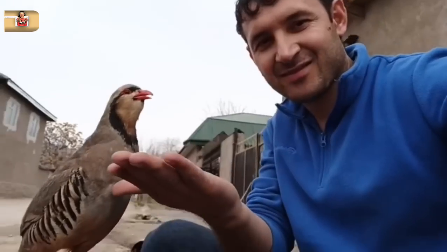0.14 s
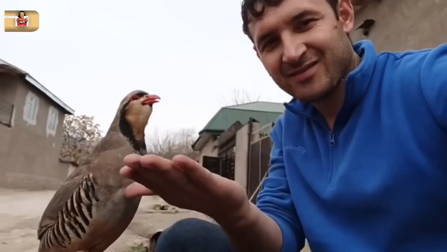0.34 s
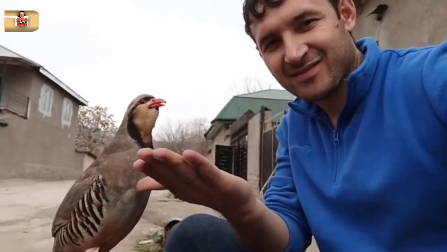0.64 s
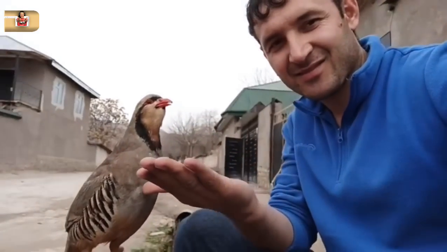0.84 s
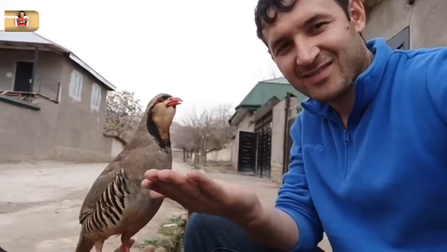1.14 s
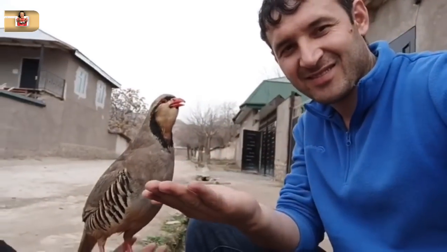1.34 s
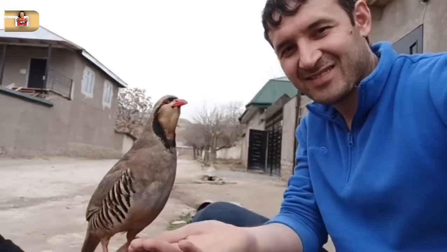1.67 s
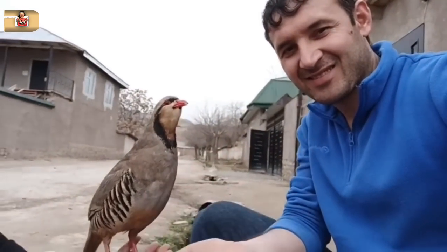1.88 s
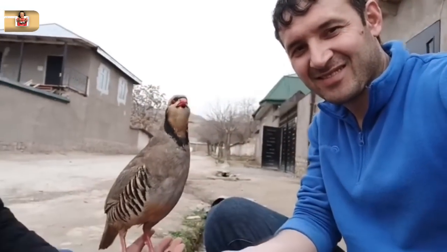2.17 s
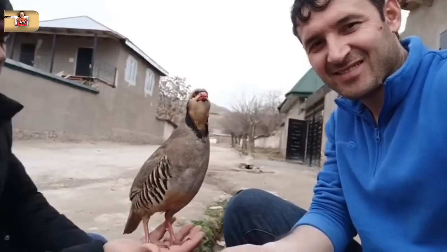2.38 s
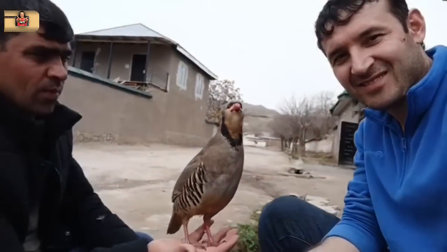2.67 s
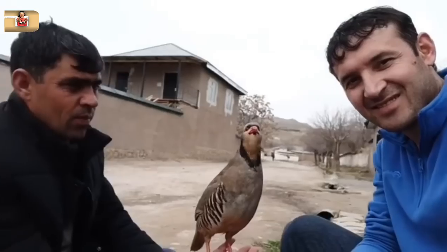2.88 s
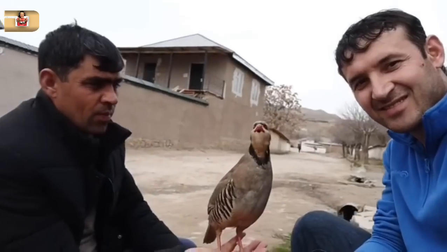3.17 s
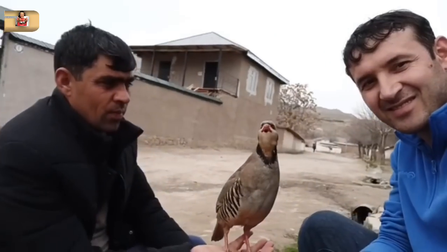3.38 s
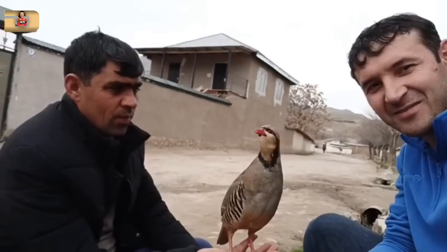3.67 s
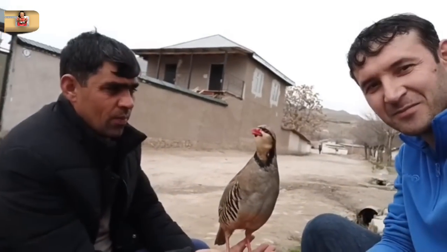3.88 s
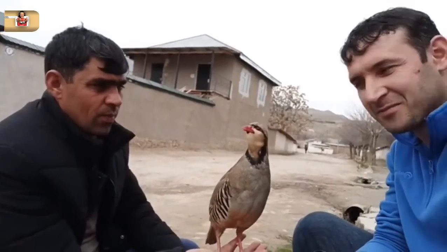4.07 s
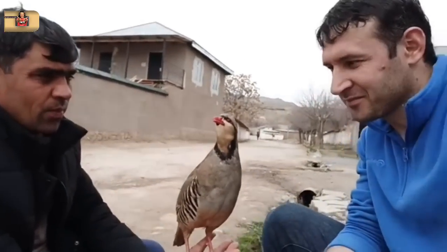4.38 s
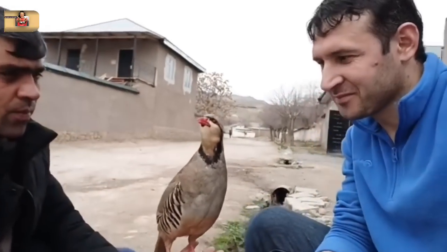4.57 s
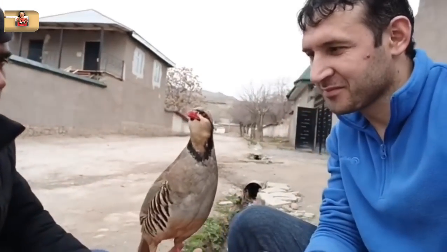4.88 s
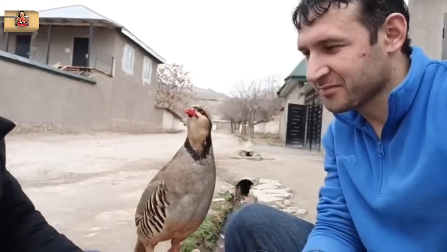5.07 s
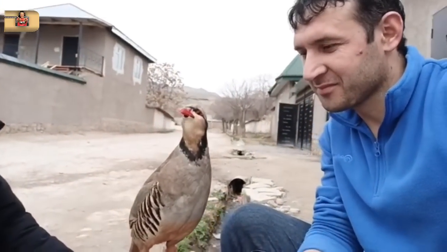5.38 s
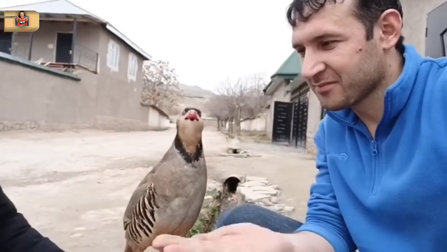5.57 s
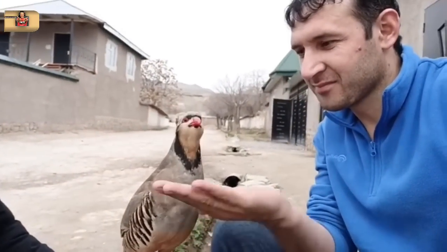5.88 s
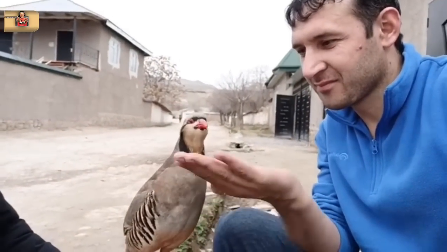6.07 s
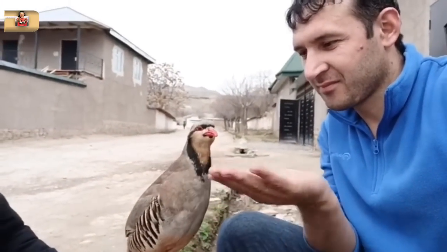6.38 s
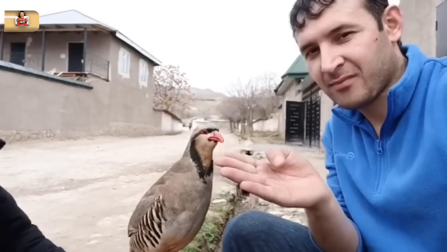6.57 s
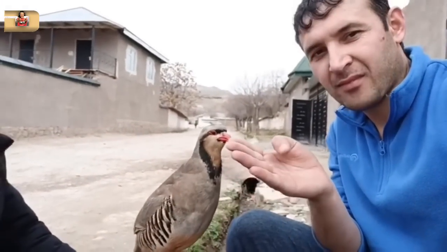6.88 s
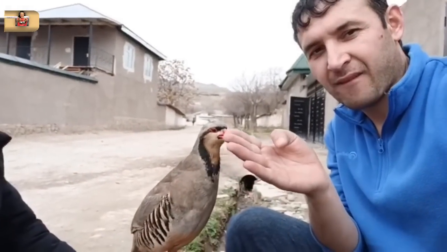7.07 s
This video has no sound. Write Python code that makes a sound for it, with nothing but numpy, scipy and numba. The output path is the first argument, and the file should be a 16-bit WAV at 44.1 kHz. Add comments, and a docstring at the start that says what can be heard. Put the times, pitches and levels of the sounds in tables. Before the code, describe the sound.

Close, dry, outdoor stereo phone sound: a chukar's throaty, nasal clucks, each a tiny hard burst breaking from higher to lower pitch with a bright rasp. First even and loud, then rougher and broken up by squawks that growl before a sharp accent, then a quick run and a few spaced last notes. Faint reflections off walls, low wind buffets, quiet lane hush; afterward very faint distant wavering tones and cloth brushes.

```python
"""In a quiet village lane a chukar partridge calls about thirty harsh notes, close by, then stops.
Pulses from its syrinx break between a high and a low register and rasp at the breaks; resonant
filters for mouth, throat and windpipe colour them. Delayed copies and decaying noise make the faint
reflections; filtered noise and short low thumps buffet the two microphone ports.
A few thin wavering tones call far off, cloth rustles softly, and shaped noise is the village hush."""
import sys
import numpy as np
from scipy import signal
from scipy.fft import rfft, irfft
from scipy.io import wavfile
from scipy.ndimage import uniform_filter1d, minimum_filter1d, map_coordinates
from numba import njit

SR = 44100
rng = np.random.default_rng(int(sys.argv[2]) if len(sys.argv) > 2 else 0)


def wav_out(sig):
    """Save sig, one row per channel (or a flat mono array), as 16-bit PCM at SR to the path in sys.argv[1]."""
    wavfile.write(sys.argv[1], SR, np.round(np.clip(np.atleast_2d(sig).T, -1, 1) * 32767).astype(np.int16))


N = 319284

# spectrum of the village hush: freq_hz, relative_level_db
VILLAGE_COLOUR = [(40, -10.5), (100, 4), (190, -4.5), (290, 6), (450, -4), (650, -7.5), (1100, -14),
                  (1700, -17.5), (2700, -22), (4200, -19.5), (5400, -30.5), (7000, -22), (13000, -36)]
# spectrum of air turbulence at the ports: freq_hz, relative_level_db
AIR_COLOUR = [(25, -27), (50, -16), (80, 1), (115, 1), (180, -13.5), (260, -11.5), (450, -26),
              (1000, -62.5)]
# gusts: start_s, length_s, relative_level_db, dying_away_db
AIR_GUSTS = [(.55, 1.07, -36.5, 7), (2.17, .93, -41, 1), (4.18, .84, -41.5, 1), (5.0, 1.25, -57, -4),
             (7.14, .1, -54, 0)]
# sharper puffs: centre_s, relative_level_db
AIR_PUFFS = [(0.54, -31.5), (0.645, -21), (0.688, -21.5), (0.776, -17), (0.955, -20.5), (1.07, -24),
             (1.238, -22.5), (1.597, -21.5), (2.38, -24.5), (2.644, -22.5), (2.809, -21.5), (4.25, -20.5),
             (4.597, -26), (4.638, -21.5), (4.74, -27), (5.011, -23.5), (5.472, -32), (6.15, -37),
             (7.19, -40.5)]
# clucks start in the high register, break to the low one, sag and may trail off in a croak;
# long ones slacken midway and catch again. slide_oct enters the low register from above (+) or below (-):
# start_s, rise_s, hold_s, croak_s, level_db, sag_db, midway_dip_db, break_after_s, catch_after_s (0 = none),
# high_pitch_hz, low_pitch_hz, slide_oct, roughness (0-1), mouth_hz, treble_db (relative)
CLUCK_NOTES = [(0.104, 0.007, 0.033, 0.003, -7.0, 7.7, 0.0, 0.004, 0.0, 495, 452, -0.08, 0.08, 1424, -24.7),
               (0.261, 0.008, 0.037, 0.003, -6.8, 11.1, 0.0, 0.005, 0.0, 490, 446, -0.06, 0.08, 1343, -21.8),
               (0.414, 0.01, 0.036, 0.004, -6.6, 11.3, 0.0, 0.006, 0.0, 539, 436, -0.02, 0.08, 1334, -24.9),
               (0.567, 0.015, 0.037, 0.007, -6.5, 17.3, 2.1, 0.012, 0.0, 487, 437, -0.02, 0.08, 1287, -26.2),
               (0.729, 0.015, 0.031, 0.004, -7.8, 9.2, 0.7, 0.01, 0.0, 556, 421, 0.06, 0.08, 1263, -27.6),
               (0.88, 0.014, 0.058, 0.007, -8.1, 5.2, 2.0, 0.012, 0.0, 559, 424, 0.05, 0.08, 1233, -24.3),
               (1.076, 0.019, 0.046, 0.006, -10.8, 0.6, 0.7, 0.014, 0.046, 531, 408, 0.05, 0.26, 1217, -22.7),
               (1.238, 0.024, 0.029, 0.018, -10.0, 7.2, 4.7, 0.02, 0.0, 553, 415, -0.0, 0.22, 1172, -24.4),
               (1.346, 0.021, 0.02, 0.005, -9.9, 13.9, 0.0, 0.016, 0.0, 490, 396, 0.09, 0.19, 1157, -21.8),
               (1.538, 0.021, 0.009, 0.019, -13.5, 6.3, 1.3, 0.019, 0.0, 526, 415, -0.09, 0.33, 1076, -23.0),
               (1.91, 0.013, 0.013, 0.006, -18.2, 0.0, 1.1, 0.01, 0.0, 649, 525, 0.01, 0.31, 1033, -16.7),
               (2.282, 0.018, 0.015, 0.037, -11.5, 0.0, 0.0, 0.023, 0.041, 571, 415, -0.02, 0.29, 1136, -19.5),
               (2.385, 0.025, 0.017, 0.007, -10.3, 13.7, 0.0, 0.027, 0.0, 624, 409, 0.02, 0.35, 1169, -20.7),
               (2.602, 0.019, 0.019, 0.006, -12.1, 9.4, 0.0, 0.034, 0.0, 586, 370, 0.28, 0.28, 1212, -21.3),
               (2.961, 0.02, 0.013, 0.006, -17.2, 4.8, 0.0, 0.046, 0.0, 652, 483, 0.02, 0.19, 1082, -24.3),
               (3.325, 0.014, 0.051, 0.007, -12.1, 0.0, 0.9, 0.027, 0.048, 579, 404, 0.01, 0.26, 1186, -20.4),
               (3.501, 0.015, 0.064, 0.006, -10.9, 4.9, 6.7, 0.024, 0.055, 577, 414, 0.04, 0.24, 1147, -22.9),
               (3.732, 0.018, 0.026, 0.004, -8.4, 12.0, 0.4, 0.015, 0.0, 622, 448, 0.04, 0.19, 1340, -25.2),
               (3.886, 0.014, 0.078, 0.004, -10.6, 7.0, 7.2, 0.032, 0.0, 617, 415, 0.09, 0.25, 1188, -26.1),
               (4.12, 0.015, 0.032, 0.003, -9.4, 9.2, 0.0, 0.012, 0.0, 604, 445, 0.13, 0.25, 1341, -27.3),
               (4.262, 0.014, 0.08, 0.009, -9.1, 0.9, 6.9, 0.021, 0.07, 603, 430, 0.1, 0.38, 1288, -23.4),
               (4.494, 0.014, 0.046, 0.006, -8.2, 16.6, 0.5, 0.013, 0.0, 602, 428, 0.1, 0.19, 1298, -26.6),
               (4.646, 0.011, 0.033, 0.01, -9.9, 16.3, 0.0, 0.033, 0.0, 600, 446, 0.01, 0.24, 1239, -26.4),
               (4.973, 0.013, 0.011, 0.022, -11.9, 0.0, 0.9, 0.034, 0.0, 555, 416, 0.3, 0.23, 1106, -19.8),
               (5.334, 0.015, 0.012, 0.022, -12.6, 0.0, 2.0, 0.018, 0.0, 542, 402, 0.07, 0.34, 1094, -23.6),
               (5.717, 0.017, 0.017, 0.006, -17.7, 7.9, 0.0, 0.044, 0.0, 670, 473, -0.05, 0.29, 1010, -17.0)]
# squawks start as a low-level growl, swell to an accent and fall away:
# start_s, growl_s, swell_s, fall_s, growl_db, accent_db, growl_pitch_hz, accent_pitch_hz,
# roughness (0-1), mouth_hz, treble_db (relative)
SQUAWK_NOTES = [(1.659, 0.048, 0.042, 0.022, -27.0, -14.7, 682, 378, 0.45, 1142, -16.0),
                (2.027, 0.05, 0.042, 0.022, -29.4, -12.4, 555, 401, 0.39, 1068, -12.5),
                (2.726, 0.027, 0.038, 0.021, -32.0, -14.0, 541, 382, 0.36, 1144, -21.0),
                (3.078, 0.032, 0.043, 0.017, -29.2, -12.5, 442, 393, 0.35, 1152, -18.0),
                (4.751, 0.008, 0.048, 0.015, -19.5, -10.4, 550, 404, 0.45, 1180, -18.0),
                (5.096, 0.048, 0.029, 0.023, -23.4, -9.7, 684, 415, 0.29, 1123, -17.4),
                (5.473, 0.034, 0.042, 0.015, -24.4, -10.0, 632, 410, 0.24, 1132, -15.7)]
# steady colour of the throat: freq_hz, level_db
THROAT_COLOUR = [(200, -12), (380, -3.5), (650, -2), (900, -3), (1250, 0), (1450, -1), (1750, -11),
                 (2050, -21), (2500, -18), (3200, -26), (4500, -50)]
# the bird stretches and draws in its neck: time_s, windpipe_tuning_factor
NECK_TUNING = [(0.12, 1.107), (0.45, 1.047), (0.9, 1.018), (1.7, 0.97), (3.1, 0.95), (3.9, 1.014),
               (4.8, 0.98), (5.7, 0.96)]
# dips between the windpipe's resonances: centre_hz, width_hz (centre before neck tuning)
WINDPIPE_DIPS = [(3050, 150), (5950, 800)]
# resonances of the windpipe: centre_hz, width_hz, relative_level_db (centre before neck tuning)
WINDPIPE_RESONANCES = [(3842, 505, -5.5), (4636, 410, 2.5), (4795, 250, -6), (7214, 723, -11.5),
                       (11920, 1100, -19.5)]
# where the bird stands: time_s, left_minus_right_db, left_lead_ms
BIRD_PLACE = [(0.1, 0.3, .16), (0.7, 1, 0.15), (1.2, -5, .13), (1.8, -6, 0.093), (2.3, -5.2, 0.079),
              (2.8, -5.5, 0.0029), (3.3, -4, 0.013), (3.8, -3.5, 0.00025), (4.3, -4, .02), (4.8, -6, 0.075),
              (5.6, -5.6, 0.08)]
# the phone's body shades and delays its ports: freq_hz, left_minus_right_db, left_phase_lead_rad
PORT_SHADING = [(300, 2.5, -0.26), (670, 5.5, -1.3), (980, 1.5, -.9), (1320, -1.5, -0.44), (2340, 0, -0.14),
                (4500, -4, 0.32), (11900, -3, 0.67)]
# thin far-off calls: start_s, length_s, start_pitch_hz, middle_pitch_hz, end_pitch_hz, level_db
DISTANT_CALLS = [(3.153, 0.65, 320, 304, 334, -54), (5.985, .22, 365, 327, 320, -55),
                 (6.132, 0.11, 1040, 970, 995, -58.5), (6.331, .65, 405, 398, 320, -58),
                 (6.54, 0.17, 1950, 1710, 1700, -68.5), (6.95, 0.069, 4300, 3700, 3350, -72)]
# soft rustles of sleeve and hand: start_s, length_s, centre_hz, level_db
CLOTH_RUSTLES = [(6.797, 0.078, 650, -54), (7.061, 0.033, 787, -50), (7.066, 0.097, 346, -55.5)]
# colour of the glancing copies, the wall tail and the phone's treble: freq_hz, level_db
GLANCE_COLOUR = [(1400, -24), (2400, 3.5)]
WALL_COLOUR = [(400, 13.5), (1500, -2), (5000, -2), (12000, -12.5)]
PHONE_COLOUR = [(8200, 0), (9200, -12), (11000, -24.5), (11800, 3)]

TIME = np.arange(N) / SR
BINS = np.fft.rfftfreq(N, 1 / SR)
VILLAGE_DB = -54.5  # average over both channels, before slow swells
CALM_DB, GUST_EDGE_S = -59, .08  # breeze between gusts, relative; softening of gust edges
# effort is in dB around a note's nominal level; pitch, mouth and treble follow it
SILENT_DB, RELEASE_S = -36, .009  # effort at a cluck's onset; drop from hold to croak
CROAK_DB, CROAK_FADE_DB = -15, 12
PITCH_OCT_PER_DB, HIGH_OCT_PER_DB, MOUTH_OCT_PER_DB, TREBLE_DB_PER_DB = .018, .002, .011, -.17
SQUAWK_MOUTH_OCT_PER_DB, SQUAWK_FALL_OCT_PER_S = .036, 9
CROAK_ROUGH, GROWL_ROUGH = .45, .25  # added roughness
BREAK_S, BREAK_DIP_DB, BREAK_ROUGH = .0025, 7, .35  # the voice stumbles as it changes register
SLIDE_S = .012  # time the pitch takes to settle after the break
HIGH_FALL_OCT_PER_S = 4  # the high register sinks towards the break
CATCH_S, CATCH_DIP_DB, SURGE_DB = .005, 7, 3  # a long note catches briefly, then surges
GROWL_DIP_DB, GROWL_DIP_S = 5, .005  # the voice slackens between growl and swell
RATTLE_S, RATTLE_DB, RATTLE_OCT = .024, 2.5, .3  # the growl comes in bursts, each sliding down in pitch
STUMBLE_DB, STUMBLES_PER_S = 4.5, 150  # unsteady effort of a fully rough voice
WOBBLE_OCT, WOBBLES_PER_S = .12, 110  # unsteady pitch of a fully rough voice
TREBLE_FLICKER_DB, TREBLE_FLICKERS_PER_S = 2.4, 70
LOUDEST_DB = -7  # ceiling on the voice's effort
TOP_HZ = 13600  # the phone passes nothing much above this


def undb(db):
    """Decibels to gain."""
    return 10 ** (np.asarray(db) / 20)


def unit(x):
    """Scale to rms 1."""
    return x / np.sqrt(np.mean(x ** 2))


def over_bins(hz, values):
    """Join points by straight lines on a log-frequency axis."""
    return np.interp(np.log(BINS + 1), np.log(hz), values)


def colour(x, points):
    """Filter by (Hz, dB) points."""
    return irfft(rfft(x) * undb(over_bins(*np.transpose(points))), N)


def smooth(x, seconds):
    """Triangular moving average, two box averages of the given length."""
    size = max(int(seconds * SR), 1)
    return uniform_filter1d(uniform_filter1d(x, size), size)


def steady(x, seconds):
    """Even out the level, keeping whatever is faster than the given time."""
    return x / np.sqrt(np.abs(smooth(x ** 2, seconds)) + 1e-12)


def walk(rate):
    """Smooth chance with a spread near 1, heading for a new value `rate` times a second."""
    knots = rng.standard_normal(N // 8)
    # straight lines between knots shrink the spread; the factor restores it
    return np.sqrt(3 / 2) * np.interp(TIME * rate, np.arange(len(knots)), knots)


def span(start, length):
    """Sample indices of an event and its progress 0-1."""
    i = np.arange(max(int(start * SR), 0), min(int((start + length) * SR), N))
    return i, np.linspace(0, 1, len(i))


def arch(u, first, middle, last):
    """Parabola through three values."""
    return first * (1 - u) * (1 - 2 * u) + middle * 4 * u * (1 - u) + last * u * (2 * u - 1)


@njit
def resonate(x, hz, width):
    """State-variable band-pass whose centre moves."""
    y, band, low = np.empty(len(x)), 0., 0.
    for i in range(len(x)):
        g, damping = np.tan(np.pi * hz[i] / SR), width / hz[i]
        v = (band + g * (x[i] - low)) / (1 + g * (g + damping))
        band, low, y[i] = 2 * v - band, low + 2 * g * v, damping * v
    return y


def village(swell_db=1, shared=0.76):
    """Quiet outdoor hush: shaped noise, partly the same in both ports, swelling gently."""
    noise = rng.standard_normal((2, N)) + shared * rng.standard_normal(N)
    return unit(colour(noise, VILLAGE_COLOUR)) * undb(VILLAGE_DB + swell_db * walk(12))


def breeze():
    """Strength of the air at the phone: gusts rise out of a calm and change in level as they pass."""
    gain = np.zeros(N)
    for start, length, db, dying_db in AIR_GUSTS:
        i, u = span(start, length)
        gain[i] += undb(db - dying_db * u)
    return undb(CALM_DB) + smooth(gain, GUST_EDGE_S)


def buffeting(air_db=-3, puff_db=-1, left_db=4, right_db=-5.5, flutter_db=4.5):
    """Eddies push on each port separately, mostly the left; a strong one is a single dull thump."""
    puff_s, puff_hz = .0052, 120  # width and lowest pitch of a thump
    gain = breeze() * undb(air_db + flutter_db * walk(35))
    out = np.array([gain * steady(colour(rng.standard_normal(N), AIR_COLOUR), .02) for _ in range(2)])
    for (centre, db), chance in zip(AIR_PUFFS, rng.random((len(AIR_PUFFS), 3))):
        i, _ = span(centre - .05, .1)
        t = TIME[i] - centre
        pitch = puff_hz * (1 + .5 * chance[0])
        swing = np.sin(2 * np.pi * (pitch * t + chance[1:, None]))  # own phase at each port
        out[:, i] += undb(db + puff_db) * np.exp(-(t / puff_s) ** 2) * swing
    return out * undb([[left_db], [right_db]])


def cluck(rise, hold, croak, level_db, sag_db, dip_db, break_s, catch_s,
          high_hz, low_hz, slide_oct, rough, mouth_hz, treble_db):
    """Quick attack, sagging hold, release into a croak; the register breaks, and a long note catches."""
    t = TIME[:int((rise + hold + RELEASE_S + croak) * SR)]
    attack = SILENT_DB * np.clip(1 - t / rise, 0, 1) ** 2
    held = np.clip((t - rise) / hold, 0, 1)
    released = np.clip((t - rise - hold) / RELEASE_S, 0, 1)
    faded = np.clip((t - rise - hold - RELEASE_S) / croak, 0, 1)
    sag = sag_db * held ** 2.5 + dip_db * np.sin(np.pi * held) ** 2
    effort = attack - sag + CROAK_DB * released - CROAK_FADE_DB * faded ** 2
    breaking = np.exp(-((t - break_s) / BREAK_S) ** 2)
    if catch_s > 0:
        since = (t - catch_s) / CATCH_S
        effort = effort - CATCH_DIP_DB * np.exp(-since ** 2) + SURGE_DB * np.exp(-(since / 2 - 1) ** 2)
        breaking = breaking + np.exp(-((t - catch_s) / BREAK_S) ** 2)
    slide = slide_oct * np.exp(-((t - break_s) / SLIDE_S) ** 2)
    high = high_hz * 2 ** (HIGH_OCT_PER_DB * effort + HIGH_FALL_OCT_PER_S * (break_s / 2 - t))
    low = low_hz * 2 ** (PITCH_OCT_PER_DB * effort + slide)
    return (np.where(t < break_s, high, low),
            level_db + effort - BREAK_DIP_DB * breaking,
            rough + CROAK_ROUGH * released + BREAK_ROUGH * breaking,
            mouth_hz * 2 ** (MOUTH_OCT_PER_DB * effort),
            treble_db + TREBLE_DB_PER_DB * effort)


def squawk(growl, swell, fall, growl_db, accent_db, growl_hz, accent_hz, rough, mouth_hz, treble_db,
           onset_s=.013, onset_db=-20, fall_db=-30):
    """A rattling growl through a half-closed beak, which opens as the voice swells and slides down."""
    t = TIME[:int((growl + swell + fall) * SR)]
    swelling = np.clip((t - growl) / swell, 0, 1)
    falling = np.clip((t - growl - swell) / fall, 0, 1)
    opening = (growl_db - accent_db) * (1 - swelling) ** 1.4
    slack = GROWL_DIP_DB * np.exp(-((t - growl) / GROWL_DIP_S) ** 2)
    burst = (t / RATTLE_S) % 1
    rattle = RATTLE_DB * np.cos(2 * np.pi * burst) * (1 - swelling)
    onset = onset_db * np.clip(1 - t / onset_s, 0, 1) ** 2
    effort = opening - slack - rattle + onset + fall_db * falling ** 1.5
    growling = growl_hz * 2 ** (RATTLE_OCT * (.5 - burst))
    slide = SQUAWK_FALL_OCT_PER_S * (growl + swell - t)
    calling = accent_hz * 2 ** (slide + PITCH_OCT_PER_DB * fall_db * falling ** 2)
    return (np.where(t < growl, growling, calling),
            accent_db + effort,
            rough + GROWL_ROUGH * (1 - swelling),
            mouth_hz * 2 ** (SQUAWK_MOUTH_OCT_PER_DB * opening),
            treble_db + TREBLE_DB_PER_DB * effort)


def gestures():
    """Pitch, loudness, roughness, mouth resonance and treble of the voice at every sample."""
    controls, sounding = np.zeros((5, N)), np.zeros(N, bool)
    for shape, notes in ((cluck, CLUCK_NOTES), (squawk, SQUAWK_NOTES)):
        for start, *row in notes:
            note = np.array(shape(*row))
            i = int(start * SR) + np.arange(note.shape[1])
            controls[:, i], sounding[i] = note, True
    # glide across the silences so that no control jumps there
    hz, db, rough, mouth_hz, treble_db = (np.interp(TIME, TIME[sounding], c[sounding]) for c in controls)
    rough = np.clip(rough, 0, 1)
    hz = hz * 2 ** (WOBBLE_OCT * rough * walk(WOBBLES_PER_S))
    treble_db = treble_db + TREBLE_FLICKER_DB * walk(TREBLE_FLICKERS_PER_S)
    gain = sounding * undb(db + STUMBLE_DB * rough * walk(STUMBLES_PER_S))
    return smooth(hz, .001), smooth(gain, .0018), rough, smooth(mouth_hz, 0.0017), smooth(treble_db, 0.0025)


def syrinx(hz, rough, shimmer_db=6, closure=.35):
    """One sharp pulse a cycle, uneven in time and size when rough, and a puff of turbulence after each."""
    cycles = np.cumsum(hz) / SR
    turns = np.arange(1, int(cycles[-1]))
    chance = rng.standard_normal((len(turns), 2))
    at = np.interp(turns, cycles, np.arange(N))
    unrest = rough[at.astype(int)]
    jitter = .005 + .125 * unrest ** 1.35  # in cycles
    at = at + jitter * chance[:, 0] * SR / hz[at.astype(int)]
    # windowed sinc places each pulse between samples
    taps = at.astype(int)[:, None] + np.arange(-7, 9)
    offset = taps - at[:, None]
    clicks = np.sinc(offset) * np.cos(np.pi * offset / 16) ** 2
    # pushed hard, the membranes alternate strong and weak beats
    size_db = unrest * (shimmer_db * chance[:, 1] + 4 * (-1.) ** turns)
    pulses = np.zeros(N)
    np.add.at(pulses, taps % N, clicks * undb(size_db)[:, None])
    puffs = np.exp(-(cycles % 1) / closure) * rng.standard_normal(N)
    return unit(pulses), unit(puffs)


def partridge(mouth_width_hz=290, lock=0.56, lock_width_hz=900, body_db=0.1, treble_trim_db=-1.7):
    """Pulses ring the mouth and throat; their sharp edges and the turbulence ring the windpipe."""
    rasp, hiss = .5, .35  # turbulence in the body and in the windpipe
    shift, vary_db = .02, 1.5  # drift of windpipe tuning and of each resonance's level
    hz, gain, rough, mouth_hz, treble_db = gestures()
    pulses, puffs = syrinx(hz, rough)
    throat = colour(pulses + rasp * rough * puffs, THROAT_COLOUR)
    body = resonate(throat, mouth_hz, float(mouth_width_hz))
    # loud notes lock on to the mouth resonance, soft ones stay broad and croaky
    locked = np.clip(lock * gain / undb(LOUDEST_DB), 0, .8)
    body = (1 - locked) * body + locked * resonate(body, mouth_hz, float(lock_width_hz))
    edges, treble = pulses + (hiss + rough) * puffs, 0
    neck = np.interp(TIME, *np.transpose(NECK_TUNING)) * (1 + shift * walk(13))
    for centre, width in WINDPIPE_DIPS:
        edges = edges - resonate(edges, centre * neck, float(width))
    for centre, width, db in WINDPIPE_RESONANCES:
        ring = resonate(edges, centre * neck, float(width))
        ring = resonate(ring, centre * neck, float(width))
        treble = treble + undb(db + vary_db * walk(15)) * ring
    voice = undb(body_db) * steady(body, 0.006) + undb(treble_db + treble_trim_db) * steady(treble, .012)
    return smooth(np.minimum(gain, undb(LOUDEST_DB)), .001) * voice


def ports(x):
    """Two microphone ports hear the bird at different levels and moments."""
    s, pan, lead_ms = np.transpose(BIRD_PLACE)
    pan_db, lead_s = np.interp(TIME, s, pan), np.interp(TIME, s, lead_ms) / 1000
    hz, shade_db, turn = np.transpose(PORT_SHADING)
    out = []
    for side in (.5, -.5):  # left, right: each takes half the difference
        shading = undb(side * over_bins(hz, shade_db)) * np.exp(1j * side * over_bins(hz, turn))
        heard = irfft(rfft(x) * shading, N)
        out.append(undb(side * pan_db) * map_coordinates(heard, [(TIME + side * lead_s) * SR], order=3))
    return np.array(out)


def glances(x, glance_db=-6, delay_s=0.001179, sway=.25):
    """Short waves glance off nearby hands and faces; the path to each port shifts as they move."""
    bright = colour(x, GLANCE_COLOUR)
    paths = [delay_s * (1 + sway * walk(3)) for _ in range(2)]
    return undb(glance_db) * np.array([np.interp(TIME - path, TIME, bright) for path in paths])


def lane(x, near_db=-24, far_db=-34, near_t60=.07, far_t60=1.0):
    """Ground and bodies scatter the call at once; house walls return a faint, duller tail."""
    t = TIME[:SR]
    near = rng.standard_normal((2, SR)) * undb(-60 * t / near_t60) * (t > .002)
    far = rng.standard_normal((2, SR)) * undb(-60 * t / far_t60) * (t > .025)

    def reflect(echo):
        return signal.fftconvolve(x[None], unit(echo) / np.sqrt(SR), axes=1)[:, :N]

    return undb(near_db) * reflect(near) + undb(far_db) * colour(reflect(far), WALL_COLOUR)


def far_calls(waver=0.017, fading_db=3):
    """Nearly pure tones that waver and fade on their way through the air."""
    out, drift = np.zeros(N), 1 + waver * walk(60)
    for start, length, first_hz, middle_hz, last_hz, db in DISTANT_CALLS:
        i, u = span(start, length)
        phase = 2 * np.pi * np.cumsum(arch(u, first_hz, middle_hz, last_hz) * drift[i]) / SR
        out[i] += undb(db) * np.sqrt(2 * np.abs(np.sin(np.pi * u))) * np.sin(phase)
    return np.array([out * undb(fading_db * walk(6.7)) for _ in range(2)])


def rustles():
    """Short brushes of cloth: band-passed noise that swells and fades, separate in each port."""
    out = np.zeros((2, N))
    for start, length, hz, db in CLOTH_RUSTLES:
        i, u = span(start, length)
        for channel in out:
            brush = resonate(rng.standard_normal(len(i)), np.full(len(i), float(hz)), 0.34 * hz)
            channel[i] += undb(db) * np.sin(np.pi * u) * unit(brush)
    return out


def scene():
    """The bird close by, the lane around it and the air on the phone."""
    bird = partridge()
    call = ports(bird) + glances(bird) + lane(bird)
    return village() + buffeting() + call + far_calls() + rustles()


def record(dry):
    """The phone holds down the loudest peaks, has a dip in the high treble and cuts the top."""
    ceiling = .88
    room_left = ceiling / np.maximum(np.abs(dry).max(axis=0), ceiling)
    limited = dry * smooth(minimum_filter1d(room_left, size=265), .003)  # ducks around each peak
    dipped = colour(limited, PHONE_COLOUR)
    return signal.sosfilt(signal.ellip(8, .2, 70, TOP_HZ, fs=SR, output="sos"), dipped)


dry = scene()
out = record(dry)
wav_out(out)
```